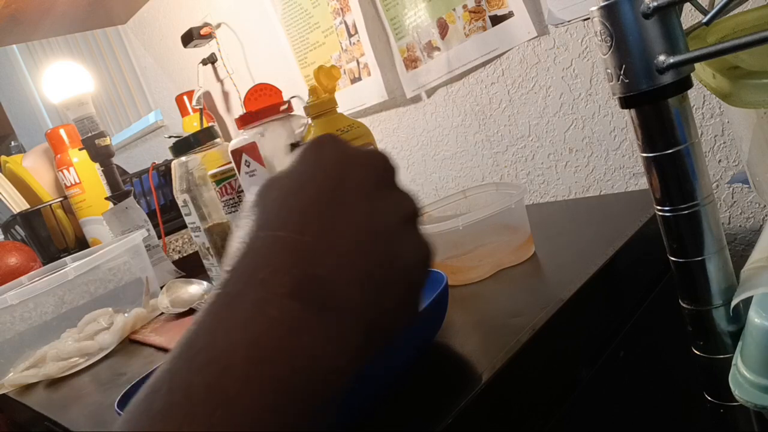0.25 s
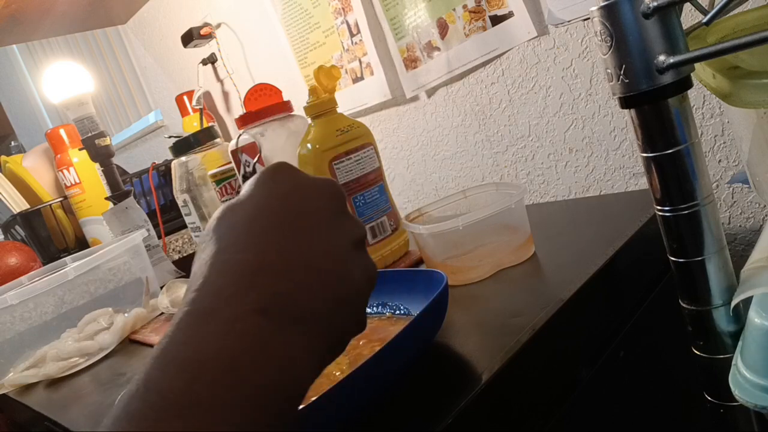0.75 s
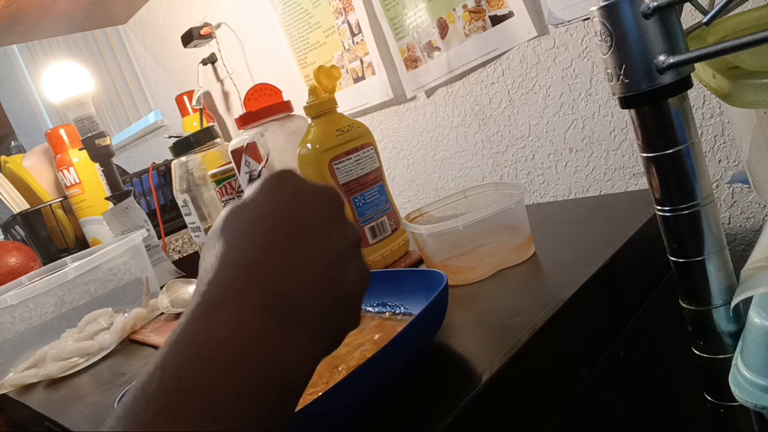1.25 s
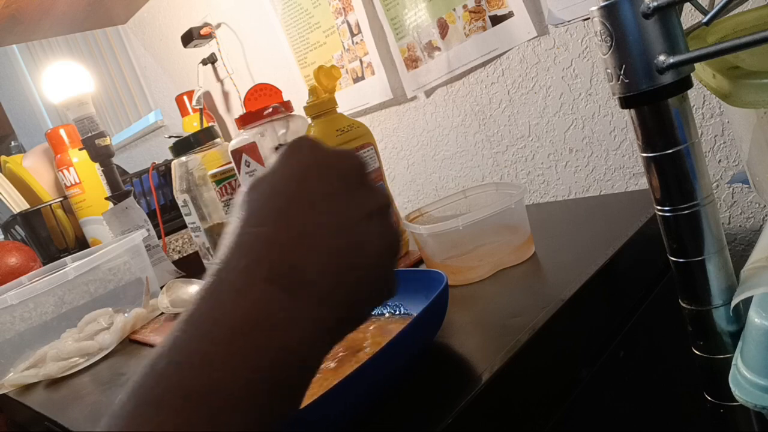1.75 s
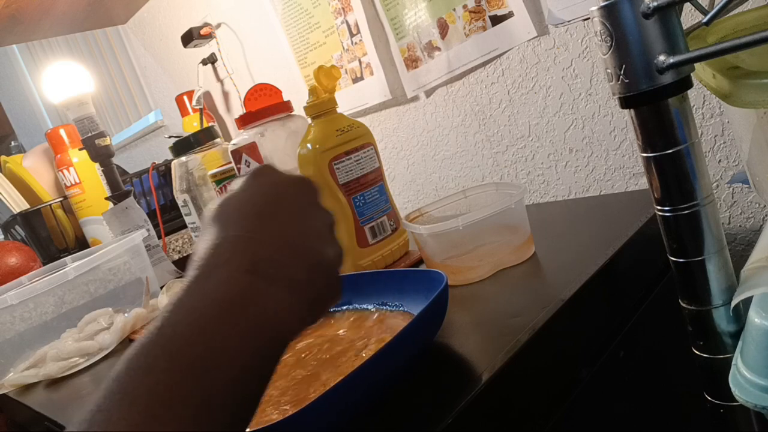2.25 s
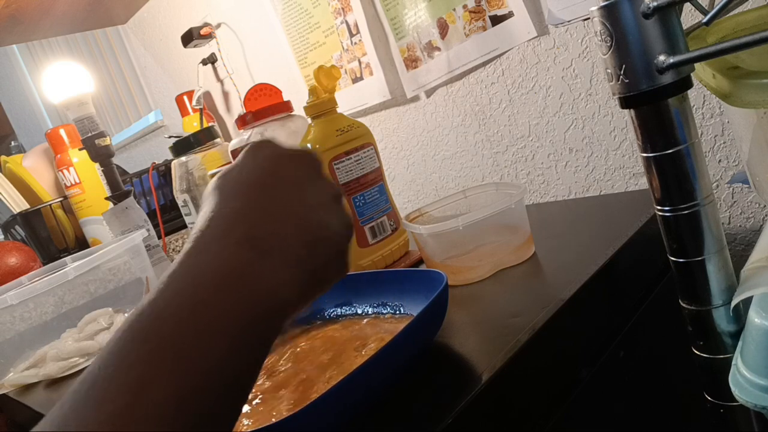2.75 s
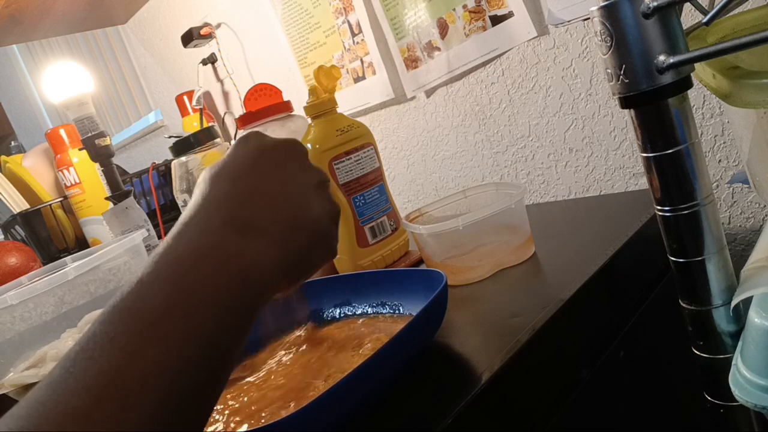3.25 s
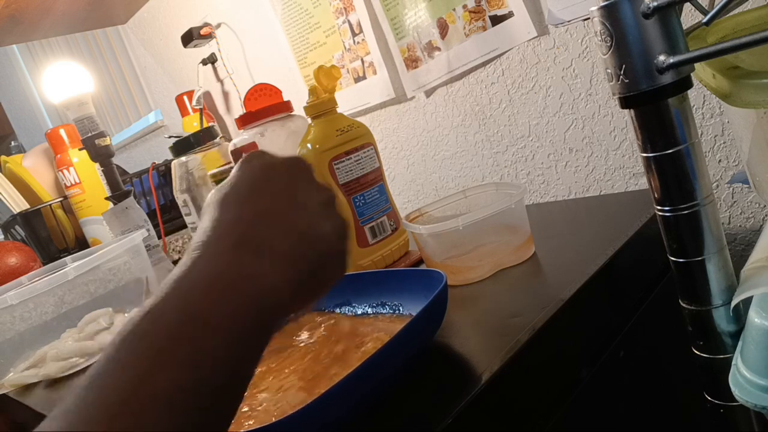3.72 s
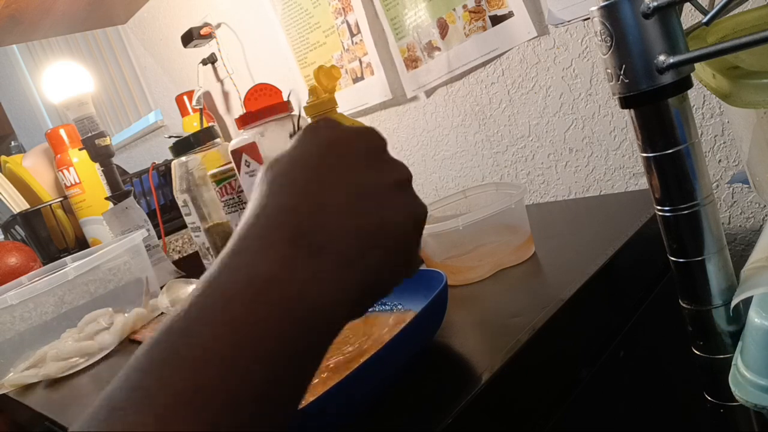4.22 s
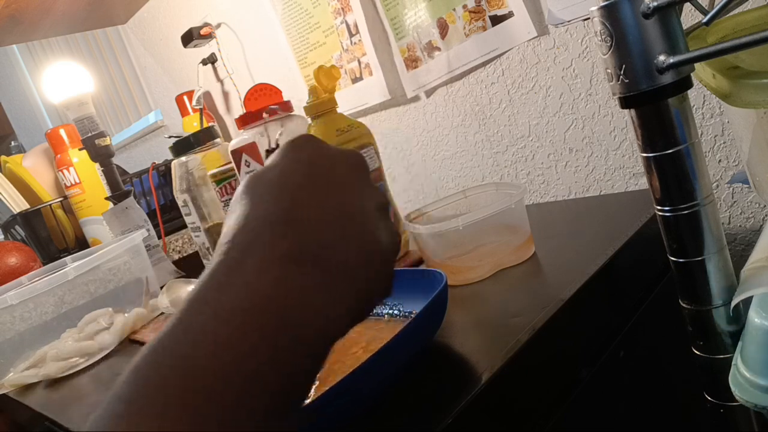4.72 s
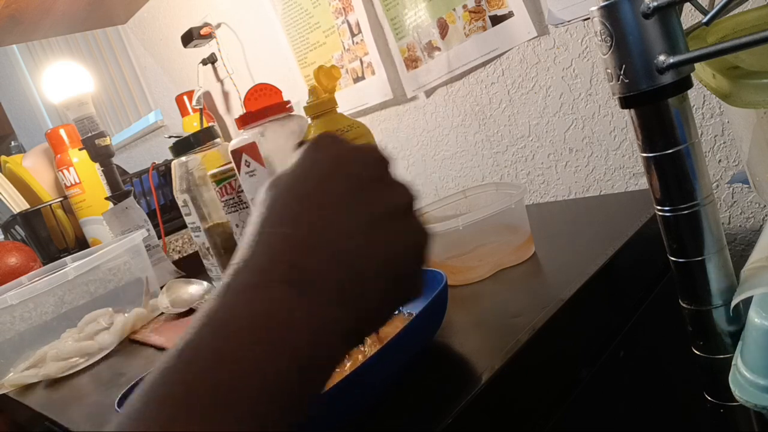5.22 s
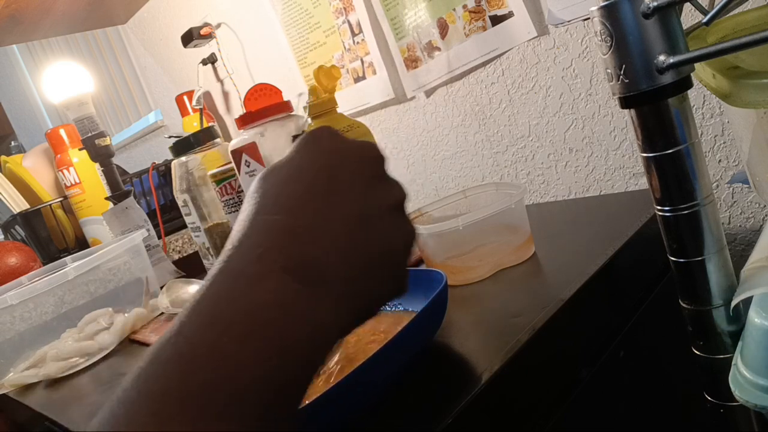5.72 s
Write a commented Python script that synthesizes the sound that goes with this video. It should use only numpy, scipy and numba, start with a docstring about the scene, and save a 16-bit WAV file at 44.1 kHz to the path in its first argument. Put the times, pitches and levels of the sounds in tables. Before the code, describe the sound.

Rapid, uneven whisking in a plastic bowl, wires scraping and ticking, liquid plopping and frothing, with a bowl bump midway.

```python
"""Wires of a whisk stutter over the wall of a plastic bowl and ring it, stroke after stroke.
They also tap the wall and slap the egg, which plops, froths and sprays; at times the bowl knocks on the counter.
A fridge hums low under it all. The bowl stands on a kitchen counter, to the right of a phone.
Noise clicks ring banks of resonances for wires, egg and counter; decaying sines make tones, plops and bubbles."""
import sys
import numpy as np
from scipy import signal
from scipy.io import wavfile
from scipy.ndimage import uniform_filter1d, map_coordinates
from numba import njit

SR = 44100
rng = np.random.default_rng(int(sys.argv[2]) if len(sys.argv) > 2 else 0)


def dump_mix(stems):
    """Bounce the given channels to the path in sys.argv[1] as a 16-bit WAV at rate SR."""
    frames = np.atleast_2d(stems).T  # one column per channel
    limited = np.clip(frames, -1, 1)  # hard clip at full scale
    pcm = np.round(limited * 32767).astype(np.int16)
    wavfile.write(sys.argv[1], SR, pcm)


N = 263718


def undb(db):
    """Gain of a level in dB."""
    return 10 ** (np.asarray(db) / 20)


def level(x, db):
    """Scale to an rms level."""
    return x * undb(db) / np.sqrt(np.mean(x ** 2))


def columns(rows):
    """Curve columns at every sample."""
    s, *cols = np.transpose(rows)
    return [np.interp(np.arange(N) / SR, s, c) for c in cols]


@njit
def svf(x, hz, width, bend):
    """State-variable band-pass, gain 1 at the centre, which bend stretches sample by sample."""
    y, b, l = np.empty(len(x)), 0., 0.
    g0, k = np.tan(np.pi * hz / SR), width / hz
    for i in range(len(x)):
        g = g0 * bend[i]
        v = (b + g * (x[i] + 1e-18 - l)) / (1 + g * (g + k))
        b, l, y[i] = 2 * v - b, l + 2 * g * v, k * v
    return y


def walk(rate):
    """Random levels held 1 / rate s and slewed twice; spread near 1."""
    k = int(SR / rate)
    steps = np.repeat(rng.standard_normal(N // k + 1), k)
    return 1.3 * uniform_filter1d(uniform_filter1d(steps, k), k)[:N]


def ring(x, hz, width, bend=np.ones(N)):
    """A steep resonance whose peak density does not depend on its width."""
    once = svf(x, 1. * hz, 1.5 * width, bend)
    return svf(once, 1. * hz, 1.5 * width, bend)


def rung(rows, attack_s, glide):
    """Damped tones from rows (start_s, peak_db, pitch_hz, t60_s); the pitch rises by glide over the ring."""
    out = np.zeros(N + SR)
    for s, db, hz, t60 in rows:
        i, t60 = int(s * SR), np.clip(t60, .003, .5)
        t = np.arange(int(t60 * SR)) / SR
        swell = np.sin(np.minimum(t / attack_s, 1) * np.pi / 2) ** 2
        tone = np.sin(2 * np.pi * hz * t * (1 + glide * t / t60 / 2))
        out[i:i + len(t)] += undb(db) * tone * 1000 ** (-t / t60) * swell
    return out[:N]


def slips(rate, spread_db):
    """Dense stick-slip clicks of widely scattered size."""
    hit = rng.random(N) < rate / SR
    size_db = spread_db * np.minimum(rng.exponential(size=N), 4.5)
    return level(hit * rng.standard_normal(N) * undb(size_db), 0)


SHARED = 0.42  # power share of the slips that both ports hear alike


def ports(rate, spread_db):
    """Slips as each port gets them: those spread around the bowl add up differently left and right."""
    both, left, right = (slips(rate, spread_db) for _ in range(3))
    return np.sqrt(SHARED) * both + np.sqrt(1 - SHARED) * np.array([left, right])


DRIFT = 0.028  # share by which the modes wander as the egg loads the wall


def pair(x, db, hz, width, spread_db, rate):
    """One mode whose loudness wanders at both ports together and at each alone."""
    both, bend = db + spread_db * walk(rate), 1 + DRIFT * walk(12)
    return np.array([ring(c * undb(both + 2. * walk(rate)), hz, width, bend) for c in x])


# background spectrum, relative: pitch_hz, density_db
KITCHEN_SPECTRUM = [(25, -14), (35, -0.5), (59, 3.5), (75, -13), (95, -16.5), (125, -31), (160, -28.5),
                    (220, -43.5), (400, -38), (600, -38), (1800, -93), (4000, -41), (14000, -63)]
KITCHEN_DB = -53.5


def kitchen():
    """Narrow bands of fluctuating noise; left and right grow alike towards the bass."""
    out, (at, dens) = 0, np.transpose(KITCHEN_SPECTRUM)
    for hz in 28 * 2 ** np.arange(0, 9, .4):
        mid, side = (ring(rng.standard_normal(N), hz, hz / 5) for _ in range(2))
        swell_db = np.clip(hz / 34.0, 1.5, 6.5) * walk(14.)
        db = np.interp(np.log(hz), np.log(at), dens) + swell_db
        out = out + undb(db) * (mid + min(hz / 180.0, 1) * side * np.array([[1], [-1]]))
    return level(out, KITCHEN_DB)


# compressor hum: time_s, rms_db
HUM_LEVEL = [(0.0, -42.5), (0.03, -42.5), (0.43, -46.5), (0.92, -41.5), (1.1, -52.5), (1.13, -46),
             (1.3, -41.5), (1.35, -47.5), (1.7, -40.5), (1.86, -47.5), (2.88, -45.5), (3.76, -46),
             (3.9, -51.5), (4.03, -45), (5.45, -46.5), (5.98, -50)]
HUM_HZ = 44.23


def fridge():
    """The compressor's low tone, a sine that wavers in pitch and level."""
    hz = HUM_HZ + 0.842 * walk(17.0)
    gain = np.sqrt(2) * undb(columns(HUM_LEVEL)[0] + 0.12 * walk(6.7))
    return gain * np.sin(2 * np.pi * np.cumsum(hz) / SR)


ROOM_T60_S, ROOM_DB = 0.079, 2.5


def room(x, count=4):
    """Counter, wall and jars scatter the sound differently to each port, and anew as hand and whisk move about."""
    t = np.arange(int(.25 * SR)) / SR
    tails = rng.standard_normal((count, 2, len(t))) * 1000 ** (-t / ROOM_T60_S)
    tails *= undb(ROOM_DB) / np.sqrt(np.sum(tails ** 2, axis=2, keepdims=True))
    share = np.array([undb(8 * walk(15)) for _ in range(count)])
    share /= np.sqrt(np.sum(share ** 2, axis=0))
    return sum(signal.oaconvolve(x * w, h, axes=1)[:, :N] for w, h in zip(share, tails))


# bowl on counter, levels relative: start_s, shudder_db, shudder_t40_s (5 ms at least), thump_hz, thump_peak_db
COUNTER_KNOCKS = [(0.391, -59, 0.12, 389, -48.5), (1.067, -57, 0.027, 206, -65),
                  (1.4, -47.5, 0.084, 254, -74), (2.275, -57, 0.032, 370, -50.5),
                  (2.851, -38.5, 0.027, 67.4, -33), (2.878, -34, 0.018, 212, -28.5),
                  (2.888, -40, 0.026, 72, -29.5), (2.893, -45.5, 0.084, 249, -33.5),
                  (2.918, -41, 0.03, 134, -38), (2.961, -64, 0.065, 204, -48),
                  (3.255, -38, 0.054, 135, -46), (3.29, -51, 0.094, 135, -41),
                  (3.642, -56.5, 0.035, 258, -60), (4.061, -43.5, 0.026, 200, -72),
                  (4.092, -58, 0.034, 284, -58), (4.404, -61, 0.028, 244, -62.5),
                  (4.844, -66, 0.036, 230, -61), (5.384, -57, 0.037, 238, -62)]
# counter-top modes: pitch_hz, width_hz, relative_db
COUNTER_MODES = [(75, 42, 2), (102, 13, -1), (135, 46, -12), (193, 51, -3), (243.5, 45, -4),
                 (402.6, 26, 1.5), (489, 69, 0.5), (840, 180, -10), (1170, 290, -12)]


def knocks(stroke_db):
    """The bowl's foot bumps and shudders on the counter, which booms; every stroke also rocks it faintly."""
    t = np.arange(int(.2 * SR)) / SR
    push = np.zeros(N + len(t))
    for s, db, length, _, _ in COUNTER_KNOCKS:
        i = int(s * SR)
        shape = 100 ** (-t / max(length, .005)) * np.minimum(t / (0.14 * length), 1)
        push[i:i + len(t)] += undb(db) * rng.standard_normal(len(t)) * shape
    rocking = undb(stroke_db - 39.5 + 8.0 * walk(17)) * slips(rate=770, spread_db=1.5)
    push = push[:N] + rocking
    thumps = rung([(s, db, hz, .13) for s, _, _, hz, db in COUNTER_KNOCKS], attack_s=0.0059, glide=0)
    boom = sum(undb(db) * ring(push, hz, width) for hz, width, db in COUNTER_MODES)
    return thumps + undb(26.0) * boom


# air pockets in the egg: start_s, relative_peak_db, pitch_hz, t60_s
AIR_PLOPS = [(0.03, -33, 910, 0.034), (0.388, -35, 1710, 0.033), (0.388, -31, 1070, .025),
             (0.97, -30, 1600, 0.026), (1.042, -28, 1585, 0.026), (1.299, -32, 850, 0.013),
             (1.3, -19, 1700, 0.015), (1.395, -30, 790, 0.028), (1.638, -29.5, 1090, 0.034),
             (1.727, -23.5, 1720, 0.028), (1.727, -29, 1180, .02), (1.973, -31, 1044, 0.068),
             (2.046, -32, 1360, 0.033), (2.848, -22, 1070, 0.02), (2.873, -22, 1070, 0.024),
             (3.252, -27.5, 1110, 0.019), (3.254, -19, 2250, 0.012), (3.262, -23, 1510, 0.018),
             (3.372, -29, 1140, 0.071), (3.723, -35, 1090, 0.027), (4.054, -26, 1370, 0.03),
             (4.057, -33, 990, .03), (4.197, -15, 1320, 0.017), (4.222, -28, 833, 0.064),
             (4.304, -35, 1210, 0.016), (4.521, -33, 960, 0.027), (4.568, -18.5, 1600, .03),
             (4.571, -29, 1040, 0.028), (4.691, -21, 1074, 0.023), (4.772, -45, 1070, 0.02),
             (4.856, -22, 727, 0.049), (5.088, -31, 1510, .03), (5.232, -21, 1010, 0.025),
             (5.279, -32, 1040, 0.039), (5.573, -22.5, 1580, 0.028), (5.707, -29, 1635, 0.027),
             (5.708, -27, 1210, 0.024), (5.75, -23, 1600, 0.033)]


def plops():
    """Air pockets plop in the egg: damped tones that rise in pitch."""
    return undb(-9.0) * rung(AIR_PLOPS, attack_s=0.0018, glide=0.37)


BUBBLE_DB, BUBBLE_SPREAD_DB = 11, 3
BUBBLE_LOW_HZ, BUBBLE_OCTAVES, BUBBLE_T60_CYCLES = 950, 2.63, 17.5


def bubbles(egg_db, count=900):
    """Small bubbles burst all through the froth, as loud as the egg is stirred; each port hears its own."""
    when, size, loud = rng.random((2, count, 3)).transpose(2, 0, 1)
    s, hz = when * (N - 1) / SR, BUBBLE_LOW_HZ * 2 ** (BUBBLE_OCTAVES * size)
    db = egg_db[(s * SR).astype(int)] + BUBBLE_DB - BUBBLE_SPREAD_DB * np.log(loud + 0.024)
    rows = np.stack([s, db, hz, BUBBLE_T60_CYCLES / hz], axis=2)
    return np.array([rung(port, attack_s=0.00056, glide=0.2) for port in rows])


# egg in the bowl: pitch_hz, width_hz, relative_db
EGG_MODES = [(820, 83, -2), (920, 200, -4.5), (894, 48, -3.5), (1040, 83, 1), (1203, 580, -3.5)]


def slosh():
    """Slaps of the thick liquid, coarser than the slips."""
    slaps = ports(rate=630, spread_db=3.0)
    modes = [pair(slaps, db, hz, width, spread_db=4.0, rate=28) for hz, width, db in EGG_MODES]
    return level(sum(modes), 0)


# droplet hiss: pitch_hz, width_hz, relative_db
SPRAY_BANDS = [(12030, 3000, -55.5), (13600, 1500, -60), (15200, 5400, -68)]


def spray(speed_db):
    """The fastest part of a stroke tears a fine hiss of droplets off the wires; it grows faster than the scrape."""
    drops = ports(rate=6600, spread_db=1.0)
    return sum(pair(drops, db + 1.8 * speed_db, hz, width, spread_db=1.0, rate=13)
               for hz, width, db in SPRAY_BANDS)


# wire on wall, levels relative, crack re ring: start_s, ring_peak_db, ring_hz, crack_db
WIRE_TAPS = [(0.388, -29, 1760, -5), (0.576, -27.5, 2690, -7), (0.645, -33.5, 2640, -10),
             (0.836, -29, 2810, -23), (0.968, -33, 2890, 0), (0.988, -24, 2670, -3), (1.137, -26, 2580, -8),
             (1.164, -21.5, 4750, -24), (1.299, -30.5, 910, 2), (1.474, -34, 2580, -11),
             (1.175, -36, 8900, -9), (1.516, -20.5, 8270, -26), (1.665, -25, 2710, -27),
             (1.798, -28, 2580, -4.5), (1.821, -29, 2880, -16), (1.974, -28, 2700, -6),
             (2.131, -30.5, 3530, -9), (2.163, -27, 2650, -9), (2.356, -28, 2790, -22),
             (2.554, -30, 2700, -3), (2.846, -22.5, 3800, 3.5), (2.847, -29, 2360, -4),
             (2.847, -32.5, 6800, -4.5), (3.253, -30.5, 6800, -4), (2.854, -59, 3700, 0),
             (2.873, -34, 1940, -1), (2.883, -44, 1580, 6), (2.903, -39, 2220, -5), (2.922, -42, 1500, -6),
             (2.966, -35, 2240, 2), (3.006, -32, 3180, -23), (3.021, -30, 1500, -18),
             (3.252, -29.5, 1170, 10), (3.341, -35, 3520, 2.5), (3.355, -25, 4730, -17),
             (3.372, -27, 6070, -13), (3.389, -24, 6630, -13), (4.856, -31, 2580, -3),
             (3.614, -39, 1130, 7), (3.887, -24.5, 2670, -26), (3.987, -31, 2860, -4),
             (4.054, -31.5, 2020, 5), (4.202, -22.5, 2700, -14), (4.282, -29.5, 1880, -12),
             (4.304, -35, 1310, 9), (4.398, -38, 1730, 7), (4.471, -32.5, 2610, -5),
             (4.492, -27, 2680, -12), (4.512, -26.5, 4840, -11), (4.52, -25.5, 1070, 2),
             (4.566, -23, 2740, -6.5), (4.647, -33, 2770, -10), (4.743, -32.5, 4610, -6),
             (4.913, -27, 2760, -22), (5.014, -26, 4360, -19), (5.099, -26, 2660, -23),
             (5.233, -26.5, 2480, 0), (5.402, -31, 1800, -18), (5.482, -24.5, 2780, -37),
             (5.679, -31, 2570, -24), (5.693, -31, 2800, -26), (5.87, -37, 2900, -15)]
TAP_T60_S = 0.033


def taps():
    """Each tap is a short ring of the spot struck plus a crack through the whole wall, keen in the top modes."""
    t = np.arange(int(.03 * SR)) / SR
    cracks = np.zeros(N + len(t))
    snap = np.exp(-t / 0.00034) + 0.2 * np.exp(-t / 0.002)
    for (s, db, _, crack_db), noise in zip(WIRE_TAPS, rng.standard_normal((len(WIRE_TAPS), len(t)))):
        i = int(s * SR)
        cracks[i:i + len(t)] += undb(db + crack_db) * noise * snap
    wall = sum(undb(db + 0.6 * (hz > 5200)) * ring(cracks[:N], hz, 2 * width)
               for hz, width, db in EGG_MODES + BOWL_MODES)
    spots = rung([row[:3] + (TAP_T60_S,) for row in WIRE_TAPS], attack_s=0.00022, glide=0)
    return undb(-2.5) * spots + undb(4.5) * wall


# whisk strokes, levels relative: start_s, rise_s, hold_s, scrape_db, brightness_db, egg_db, spray_db
WHISK_STROKES = [(0.0, 0.0017, 0.08, -43.5, -8, -52.5, 6), (0.144, 0.02, 0.06, -44.5, -6, -54.5, 4),
                 (0.296, 0.026, 0.098, -42, -8, -53.5, 0), (0.441, 0.067, 0.078, -49.5, -7, -57.5, -6),
                 (0.642, 0.029, 0.087, -42.5, -3, -56, -3), (0.759, 0.088, 0.011, -43, -14, -57, -4),
                 (0.95, 0.023, 0.064, -43, -5, -51, -4), (1.082, 0.055, 0.021, -39.5, -9, -51.5, 2),
                 (1.153, 0.0053, 0.028, -38.5, -2.5, -55, 0), (1.28, 0.05, 0.12, -42.5, -8, -53, -4),
                 (1.416, 0.025, 0.02, -42.5, -9, -53, 10), (1.467, 0.018, 0.024, -40.5, 0, -70, 5),
                 (1.524, 0.025, 0.013, -45, -7.5, -53.5, 4), (1.627, 0.042, 0.0014, -43.5, -7.5, -59.5, -9),
                 (1.702, 0.027, 0.044, -45, -7, -52.5, -5), (1.781, 0.041, 0.039, -37, -4.5, -53, 0),
                 (1.958, 0.047, 0.011, -38.5, -4.5, -50.5, 0), (2.046, 0.01, 0.042, -45.5, -11, -67, -1),
                 (2.083, 0.049, 0.034, -43.5, -4, -57.5, -2), (2.142, 0.023, 0.0061, -38.5, -5, -55, 5),
                 (2.196, 0.011, 0.037, -48, -1.5, -55.5, 13), (2.327, 0.033, 0.051, -40, -5.5, -61.5, -5),
                 (2.482, 0.081, 0.015, -40.5, -3.5, -53, 6), (2.843, 0.0022, 0.05, -56.5, 3, -50.5, 13),
                 (2.959, 0.0066, 0.02, -45.5, -5, -54, 4), (2.984, 0.027, 0.008, -44.5, 0, -61.5, 8),
                 (3.117, 0.017, 0.001, -45, -3, -61, 5), (3.249, 0.002, 0.002, -52, 0, -54, 12),
                 (3.322, 0.034, 0.034, -41.5, -2, -53, 4), (3.48, 0.043, 0.0067, -44, -3, -61, 2),
                 (3.61, 0.0036, 0.002, -56, -4, -54.5, -7), (3.653, 0.0096, 0.04, -44.5, -7.5, -54, 7),
                 (3.702, 0.019, 0.012, -41.5, -8.5, -62, 3), (3.759, 0.0084, 0.017, -51.5, 3, -56, 4),
                 (3.813, 0.051, 0.037, -41.5, -4, -59, 6), (3.964, 0.012, 0.0047, -43.5, -1, -53.5, -1),
                 (4.05, 0.0034, 0.001, -53.5, -0.5, -54, 1), (4.138, 0.058, 0.013, -38.5, -3.5, -54.5, 2),
                 (4.281, 0.0076, 0.0032, -45.5, -3, -56, -3), (4.394, 0.0023, 0.057, -59, -6.5, -62, -8),
                 (4.463, 0.049, 0.042, -40.5, -4, -54, 1), (4.625, 0.03, 0.054, -41.5, -7, -51.5, -3),
                 (4.733, 0.0072, 0.014, -47.5, -7.5, -50.5, 5), (4.805, 0.054, 0.057, -41.5, -6, -56, -2),
                 (4.979, 0.049, 0.07, -38.5, -7, -58.5, -1.9), (5.147, 0.032, 0.03, -46, -12.5, -55, -2),
                 (5.203, 0.028, 0.012, -43, -4.5, -52.5, -3), (5.265, 0.019, 0.015, -46, -5, -54.5, 4),
                 (5.361, 0.01, 0.06, -42.5, -12.5, -54.5, -6.9),
                 (5.446, 0.028, 0.0033, -42.5, -7.5, -77, -4), (5.549, 0.019, 0.0055, -45.5, -9, -56, -6),
                 (5.668, 0.019, 0.048, -42.5, -6.5, -63, -6), (5.776, 0.034, 0.015, -52, -8, -60.5, 3),
                 (5.838, 0.052, 0.021, -40, -4, -87, 9)]
# wires land, speed up through RISE_DB, hold, then slow ever faster
LAND_S, RISE_DB, FADE_DB_S, BRAKE_DB_S2 = 0.0044, 11, 166, 145
SAG_DB_S, DULL_DB_S = 20, 11  # level and brightness lost while a stroke holds and drags
BRIGHTEN, EGG_FOLLOWS = 0.09, 0.55  # dB of brightness and of egg per dB of stroke shape
EGG_SETTLES_DB_S2 = 497  # the egg falls still ever faster once the wires leave it


def strokes():
    """Scrape level, brightness, egg level and spray in dB: overlapping strokes add their power."""
    start, rise, hold, db, bright_db, egg_db, spray_db = np.transpose(WHISK_STROKES)[:, :, None]
    t = np.arange(0, N, 64) / SR
    since = t - start
    held = np.clip(since - rise, 0, hold)
    after = np.maximum(since - rise - hold, 0)
    landing = -RISE_DB * np.maximum(-since, 0) / LAND_S
    rising = -RISE_DB * np.clip(1 - since / np.maximum(rise, .002), 0, 1)
    slowing = -FADE_DB_S * after - BRAKE_DB_S2 * after ** 2
    shape = landing + rising - SAG_DB_S * held + slowing
    power = undb(np.maximum(2 * (db + shape), -240))  # doubled dB: power
    egg_shape = EGG_FOLLOWS * shape - EGG_SETTLES_DB_S2 * after ** 2
    egg = undb(np.maximum(2 * (egg_db + egg_shape), -240))
    mean = lambda v: np.sum(power * v, axis=0) / power.sum(axis=0)
    bright = mean(bright_db + BRIGHTEN * np.maximum(shape, -40) - DULL_DB_S * held)
    scrape_level, egg_level = (10 * np.log10(p.sum(axis=0)) for p in (power, egg))
    return columns(np.transpose([t, scrape_level, bright, egg_level, mean(spray_db)]))


# bowl wall: pitch_hz, width_hz, relative_db
BOWL_MODES = [(1610, 314, -0.5), (1947, 230, 0), (2345, 380, -4), (2470, 310, -5), (2673, 300, 1.5),
              (2920, 210, -1.5), (3338, 164, -5), (3754, 790, -4), (4480, 590, -1.5), (4830, 490, -4),
              (5500, 470, -4.5), (6030, 580, -3), (6316, 770, -3.5), (7080, 500, -8.5), (7930, 225, -5),
              (8420, 470, -3.5), (8740, 1050, -7), (9720, 1080, -6), (10480, 2000, -13.5)]
SWEEP_DB = 1.17  # each part of the wall that the wires cross favours other modes


def scrape(bright_db, full_db):
    """Slips of many wires ring the wall; as they travel each mode swells and fades; fast strokes favour high ones."""
    wires, chatter = [ports(rate=2500, spread_db=2.5) for _ in range(2)], 1.15 * walk(110)
    out = 0
    for k, (hz, width, db) in enumerate(BOWL_MODES):
        octaves = np.log2(hz / 2800)
        high_db = np.clip(octaves / 1.36, 0, 2.5) * (bright_db + 5.5)
        low_db = np.clip(-octaves / .5, 0, 1) * (full_db + 6.5)
        mode_db = db + chatter + high_db + low_db + SWEEP_DB * walk(11)
        out = out + pair(wires[k % 2], mode_db, hz, width, spread_db=2.0, rate=45)
    return out * undb(12.)


# place of the bowl: time_s, left_minus_right_db, left_lag_ms
BOWL_PLACE = [(0, 4.5, 0.92), (1.8, 2, 0.87), (2.1, 2, 1.012), (3.9, 1.5, 0.95), (4.1, 1.9, 0.853),
              (5.4, 1.5, 0.8), (5.98, 7.5, 0.75)]
THIN = 0.35  # dB of fullness lost per dB of stroke level


def scene():
    """The bowl is nearer the right port, so the left hears its direct sound late; PLACE sets the balance."""
    stroke_db, bright_db, egg_db, spray_db = strokes()
    full_db = np.clip(-7.5 - THIN * (stroke_db + 44.5), -16, 0)
    pan_db, lag_ms = columns(BOWL_PLACE)
    whisk = undb(stroke_db - 3.5) * scrape(bright_db, full_db) + undb(egg_db - 3.5) * slosh() + bubbles(egg_db)
    hits = taps() + plops()
    # a small thin bowl radiates little below its lowest mode, and wet plastic swallows the top
    thin = signal.butter(8, [730., 11500.], "band", fs=SR, output="sos")
    hit_treble = undb(-8.0) * ring(hits, 15000.0, 3700.0)
    mist = undb(spray_db) * spray(stroke_db + bright_db + 47.5) + hit_treble
    bumps = knocks(stroke_db)
    near = signal.sosfilt(thin, whisk + hits) + mist + bumps
    near[0] = map_coordinates(near[0], [np.arange(N) - lag_ms * SR / 1000], order=3)
    body = signal.sosfilt(thin, whisk + undb(-4.0) * hits)
    far = room(body + undb(0.5) * mist + undb(-12.5) * bumps)
    return (near + far) * undb(np.array([pan_db, -pan_db]) / 2) + fridge() + kitchen()


TOP_HZ = 15800


def record(dry):
    """The left port is duller in the top octave; the phone cuts the top."""
    dulled = 1.18 * svf(dry[0], 12140.0, 8600.0, np.ones(N))
    dry = dry - np.array([dulled, 0 * dry[1]])
    return signal.sosfilt(signal.ellip(10, .2, 80, TOP_HZ, fs=SR, output="sos"), dry)


dry = scene()
out = record(dry)
dump_mix(out)
```